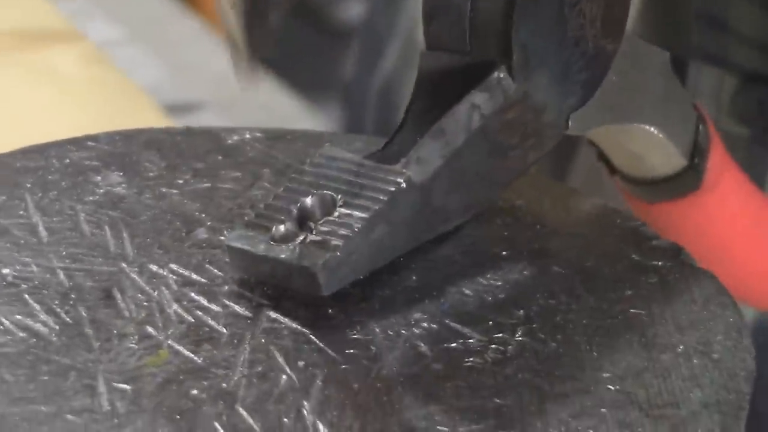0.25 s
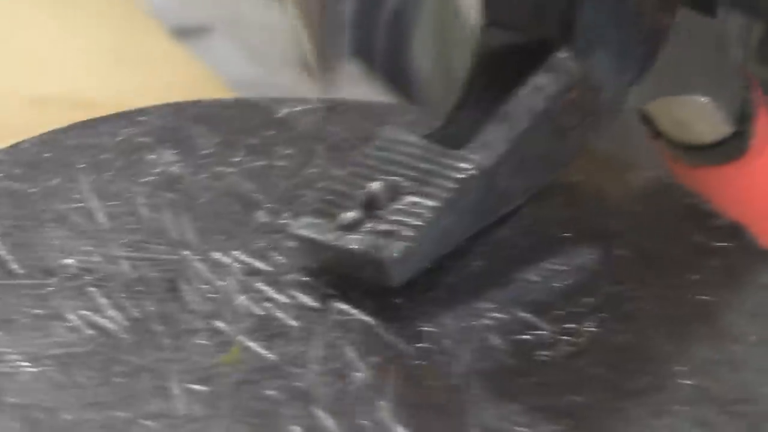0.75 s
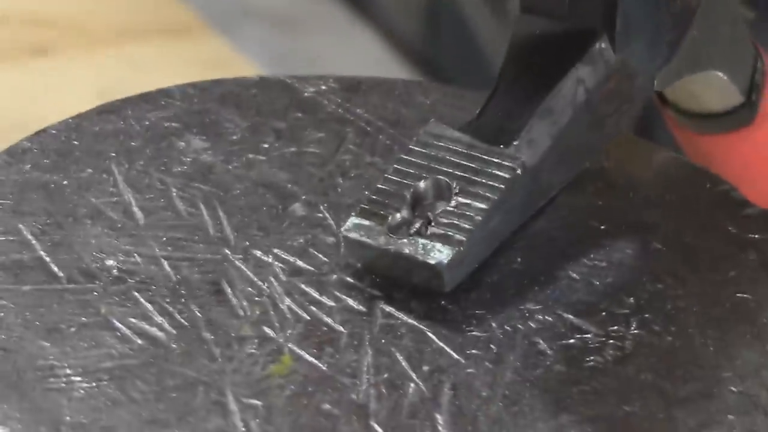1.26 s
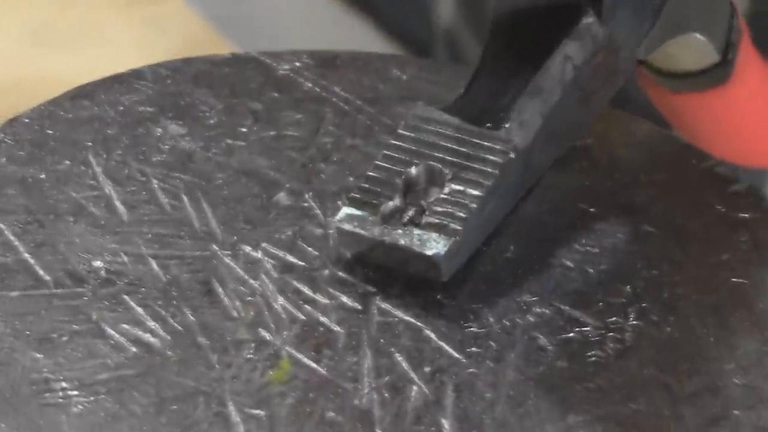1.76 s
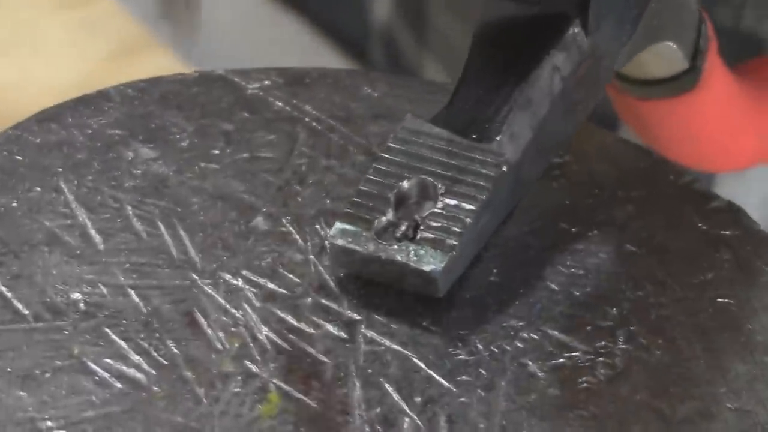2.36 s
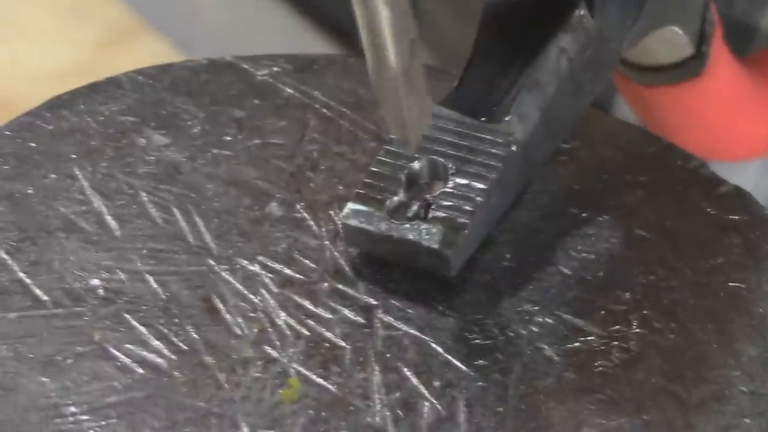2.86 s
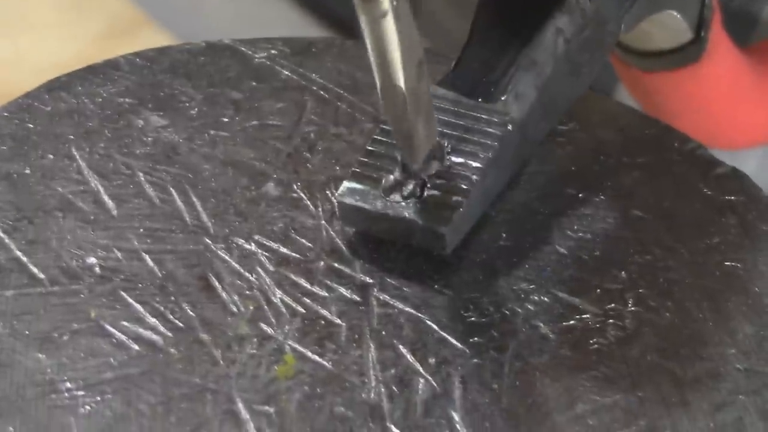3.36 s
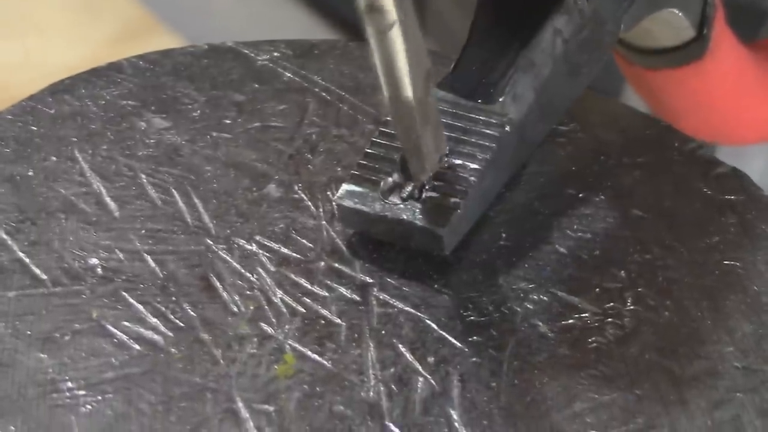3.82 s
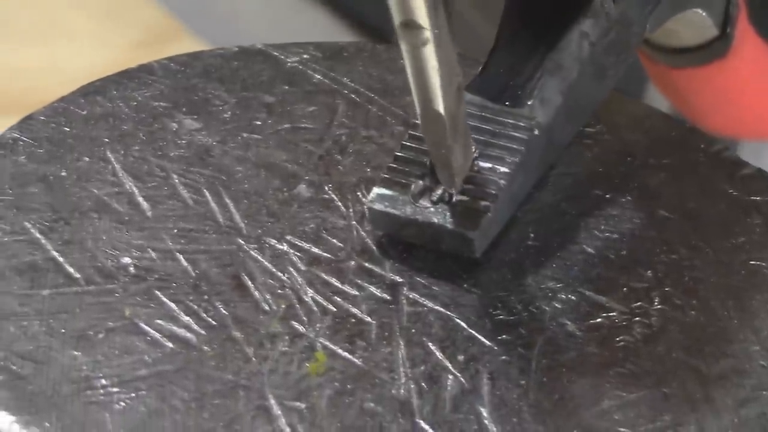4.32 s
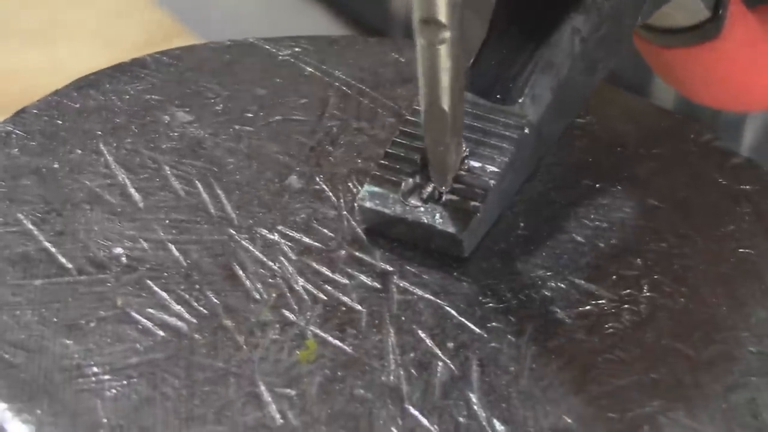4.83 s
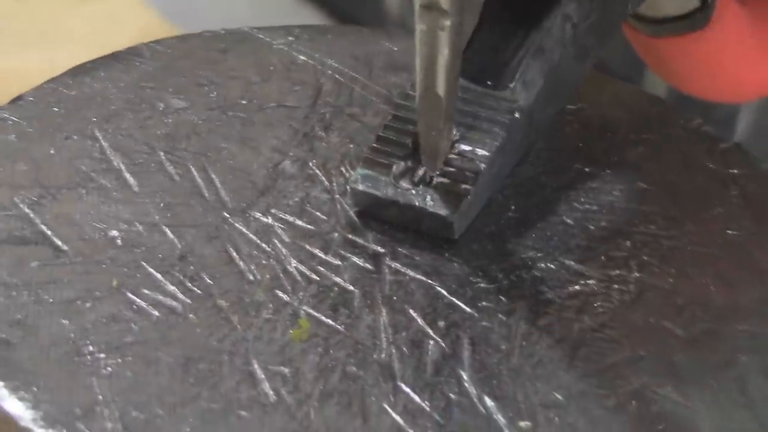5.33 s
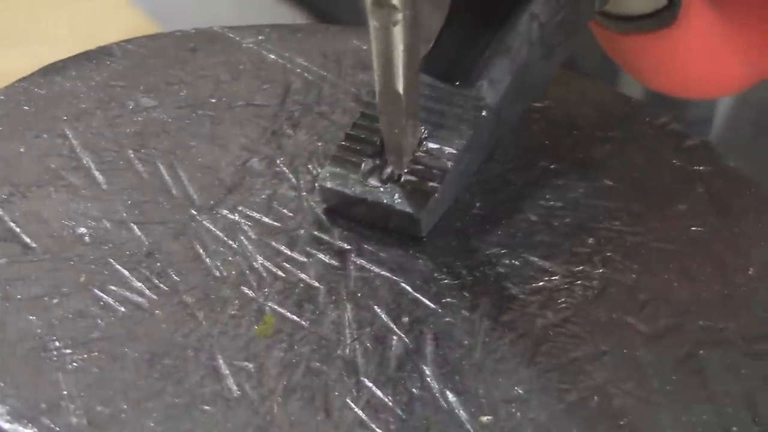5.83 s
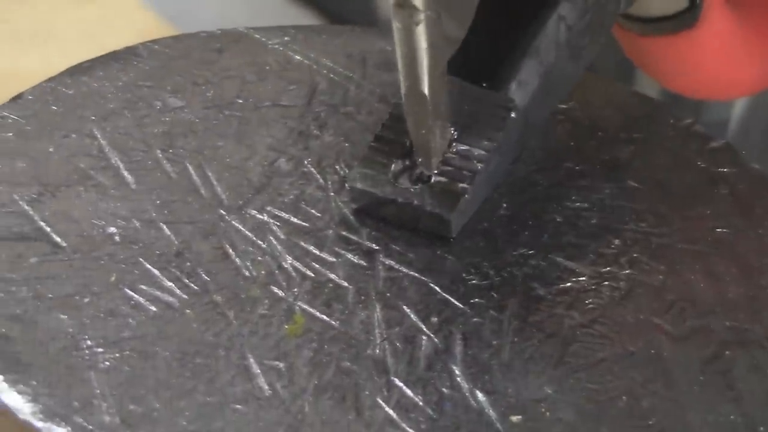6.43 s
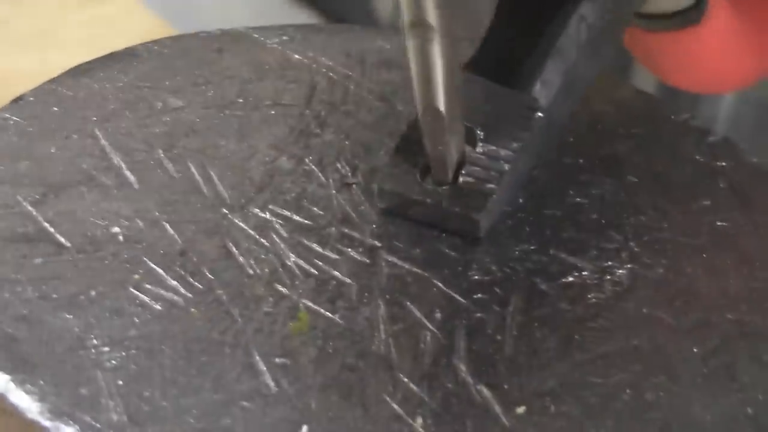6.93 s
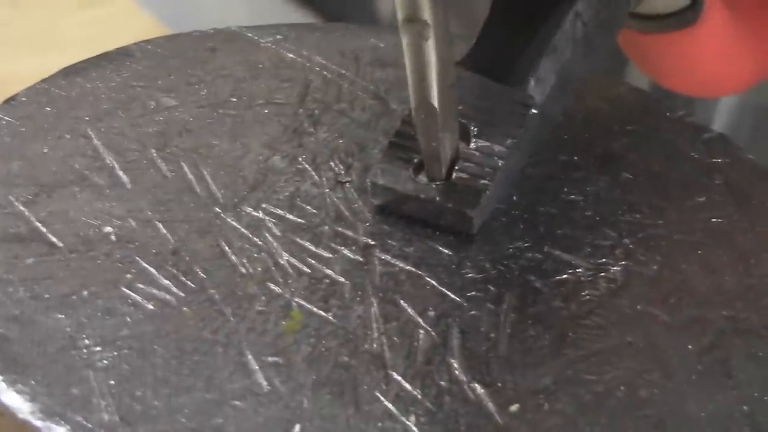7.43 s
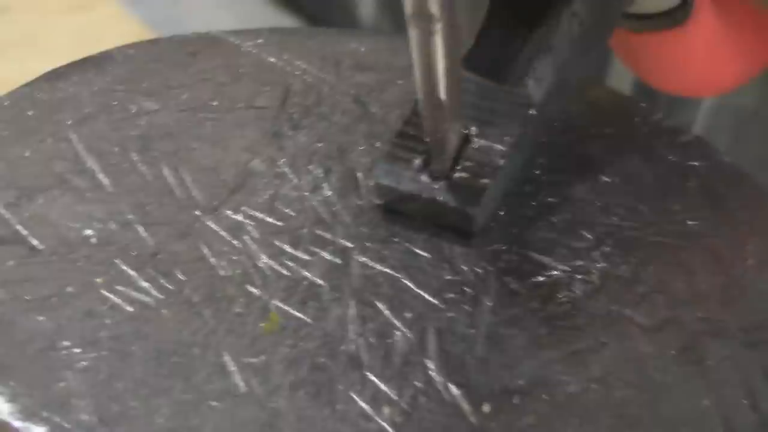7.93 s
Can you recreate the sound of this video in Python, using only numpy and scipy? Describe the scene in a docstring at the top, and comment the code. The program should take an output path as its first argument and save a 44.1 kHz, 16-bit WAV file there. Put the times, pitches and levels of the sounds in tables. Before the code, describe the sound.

Plier jaws tick and scrape on a steel block, then a hammer strikes a steel punch in several sharp, ringing blows.

```python
"""Hammer and punch at the workbench

A small workshop, the microphone close to a steel block on the bench. A plier jaw ticks and scrapes over
the block while a steel punch is set, then a hammer drives the punch into the jaw. Each blow cracks, rings
hammer and punch and makes the block hop on the boards. The room answers for half a second over a quiet
noise floor with a throbbing hum and a few faint tones."""
import sys
import numpy as np
from scipy import signal
from scipy.fft import rfft, irfft
from scipy.io import wavfile
from scipy.ndimage import uniform_filter1d

SR = 44100
rng = np.random.default_rng(int(sys.argv[2]) if len(sys.argv) > 2 else 0)


def generate_wav(sig):
    """Save sig (samples, or channels by samples) to the path in sys.argv[1] as 16-bit PCM at SR."""
    pcm = np.round(np.clip(np.atleast_2d(sig).T, -1, 1) * 32767).astype(np.int16)
    wavfile.write(sys.argv[1], SR, pcm)


N = 360738
T = np.arange(N) / SR

# Blows and rebounds, steel on steel. Each row: start in seconds, crack level in dB, brightest pitch in Hz,
# treble tilt in dB per octave, then the levels in dB of chatter, tool ring and the knock of the block.
BLOWS = [(5.407, -2.5, 2650, -2.5, -7, -39.5, -7), (5.716, 1, 4500, 3, -14, -37, -3.5),
         (5.755, -11.5, 2640, -7, -2.5, -57, -14), (6.1191, -12, 2763, -5, -9, -68, -10.5),
         (6.37, -6, 2800, -1, 3.5, -45.5, -5.5), (6.9004, 7.5, 6360, 4.5, -6, -34.5, -1.5),
         (6.9262, 5, 2728, 3, -7, -43.5, -5.5), (7.9646, 3.5, 7800, 4.5, -0.5, -32, -2),
         (7.98, -16.5, 6070, -4, -12.5, -56, -7), (8.0013, -12, 8000, 2, -1, -34.5, -2)]
# Modes of the plier jaw. Each row: frequency in Hz, level in dB, t60 in seconds.
JAW_MODES = [(370, -26, 0.01), (738.4, -14.5, .025), (1213, -11.5, 0.013), (1560, -13.5, 0.015),
             (2270, -9, .018), (2516, -4, 0.016), (3660, -7, 0.013), (4500, 2.5, 0.0074), (4960, -9, .02),
             (5400, -12, 0.014), (6100, -5, 0.0059), (7026, -6.5, .012), (8500, -3, 0.0052),
             (9800, -13, .008), (10630, -8, .012), (11620, -14, 0.0048), (14100, -14, .006)]


def hammer_blows():
    """Steel cracks and chatters, hammer and punch ring on. Returns the close sound and the room's feed."""
    # Spectra of the crack and of the thinner, brighter chatter. Each row: frequency in Hz, level in dB.
    crack_spectrum = [(710, -16), (1200, -4.5), (1850, 0.5), (2560, 5.5), (3140, 3.5), (3690, 4),
                      (4530, -4.5), (6400, 1.5), (7050, -2), (10400, -11.5), (15800, -28)]
    chatter_spectrum = [(1180, -34), (2000, -3.5), (2850, -5), (4920, -10.5), (7770, -6), (11100, -14),
                        (13100, -9.5), (14100, -24), (15300, -17), (15800, -28.5)]
    # Modes of hammer and punch. Each row: frequency in Hz, level in dB, t60 in seconds.
    tool_modes = [(6550, -11, .09), (7045, -9, .15), (7930, 0, .23), (3450, -7, .1), (2750, 11, .03),
                  (11600, -22, .1)]
    near, to_walls = np.zeros(N), np.zeros(N)
    size, chatter_s = 2048, 0.0055
    chatter_fade = np.exp(-(T[:size] / chatter_s) ** 4)
    for start, db, bright_hz, treble_db, chatter_db, ring_db, _ in BLOWS:
        crack = noise(crack_spectrum, size, treble_db) * fade(size, t60=0.011)
        crack += resonate(crack, [(bright_hz, 0.21 * bright_hz, 10)])
        crack += undb(chatter_db) * noise(chatter_spectrum, size, treble_db / 2) * chatter_fade
        crack = undb(db) * crack / np.abs(crack).max()
        add(near, start, crack)
        add(near, start, undb(ring_db) * ring(tool_modes, SR // 2, scatter_db=1))
        # the walls get the blow from all sides: the same energy, but an even colour
        click = colour(signal.unit_impulse(256, "mid"), crack_spectrum, treble_db - 8.5)
        add(to_walls, start, click * np.linalg.norm(crack) / np.linalg.norm(click))
    return near, to_walls


def block_knocks():
    """The block meets the bench with a dull knock; the boards ring and what lies on them rattles."""
    # The block rocks and lands again. Each row: middle of the contact in seconds, level in dB,
    # pitch in Hz, ring of the boards in dB.
    landings = [(5.4144, -20, 786, -22.5), (5.7219, -16, 847, -20), (5.7265, -7.5, 889, -8),
                (6.1261, -12, 690, -25), (6.418, -34, 500, -32), (6.907, -7, 1340, -2),
                (6.9106, -5, 1133, -7), (6.918, -19, 905, -5.5), (6.9345, -2, 787, 0.5),
                (6.9441, 2, 1323, -9.5), (6.957, -10, 830, 4), (7.2344, -41, 980, -35),
                (7.2469, -45, 944, -29.5), (7.257, -42, 1200, -31.5), (7.9732, 2, 1340, -1),
                (7.992, -6, 895, -5), (8.0131, 7, 1330, 2.5), (8.0223, 0, 1000, -16),
                (8.0355, -0.5, 930, -2.5), (8.044, -17, 700, -2.5)]
    # Modes of the bench boards. Each row: frequency in Hz, level in dB, t60 in seconds.
    board_modes = [(178, -36, 0.13), (283.3, -26.5, 0.063), (392, -29, .04), (462, -22.5, 0.051),
                   (495, -22, 0.11), (560, -24, 0.06), (712.6, -25, .04), (860, -17, .045),
                   (989, -20.5, .04), (1200, -21, 0.028), (1240, -24, 0.046), (1424, -21.5, 0.047),
                   (1700, -26.5, .03)]
    rattle_spectrum = [(200, -25), (500, -2.5), (1000, -2), (1700, -5.5), (3000, -11.5), (6000, -33)]
    lag_s, knock_hz, boards_over_knock_db = .002, 1190, 3  # each blow drives the block down
    driven = [(start + lag_s, db, knock_hz, db + boards_over_knock_db) for start, *_, db in BLOWS]
    out, size = np.zeros(N), 4096
    t = np.arange(-128, 128) / SR
    rise = np.clip(T[:size] / 0.0013, 0, 1)  # the boards take up the push over the contact
    for time, db, hz, boards_db in driven + landings:
        contact = np.sin(2 * np.pi * hz * t) * np.exp(-(t * hz / 0.6) ** 2)
        add(out, time + t[0], undb(db) * contact)
        rattle = noise(rattle_spectrum, size) * fade(size, t60=0.055)
        boards = ring(board_modes, size, scatter_db=3)
        add(out, time, undb(boards_db) * rise * (boards + undb(-15) * rattle))
    return out


def tool_ticks():
    """Punch and pliers touch the block: a click and the jaw's ring, coloured by where the touch falls."""
    # Each row: start in seconds, level in dB, treble gain in dB, bass gain in dB.
    touches = [(0.4, -54, -10, -7), (0.889, -53, -23, 4), (1.018, -52, -4, 11), (1.1594, -44, -1, 17.5),
               (1.2712, -20, -7, -5), (1.3243, -40.5, -19, 13), (1.3364, -41.5, -6, 23),
               (1.588, -44, 11, 10), (1.654, -51, 11, -11), (1.7717, -1.5, 5.5, -6),
               (1.7772, -13.5, 11.5, -9), (1.82, -23, -28, -3.5), (1.832, -30, -18, 5),
               (1.842, -21, -5, -2), (1.9519, -37, 9, 12), (2.032, -32.5, 0, -4), (2.6526, -23.5, 4, 4.5),
               (2.7685, -47, -7, 18), (2.789, -46.5, -12, 9), (3.6032, -41, -4.5, 1),
               (3.6068, -36.5, 1, -7.5), (3.6094, -34.5, 0, -3), (3.6577, -42, 10, -6),
               (3.6677, -52, 6, -4), (3.738, -44, -7, -4), (3.7423, -38.5, -13.5, 4),
               (4.0274, -46.5, -7, 22), (4.202, -44, -9, 15.5), (4.499, -55, 0, 16), (4.84, -54, -20, 3),
               (4.852, -39.5, -5.5, 8), (5.989, -51.5, 3.5, 2), (6.5914, -46, 5.5, 9),
               (6.8497, -38.5, -7.5, 13), (7.278, -43, -9, 16)]
    out, size = np.zeros(N), 2048
    rise = np.clip(T[:size] / .0006, 0, 1)
    for start, db, treble_db, bass_db in touches:
        modes = [(hz, mode_db + treble_db * (hz > 5000) + bass_db * (hz < 2000), t60)
                 for hz, mode_db, t60 in JAW_MODES]
        click_spectrum = [(800, -30.5), (3000, -1), (9000, treble_db), (16000, treble_db - 7)]
        click = noise(click_spectrum, size) * fade(size, t60=0.0082)
        tick = rise * (ring(modes, size, scatter_db=2) + click)
        add(out, start, undb(db) * tick / np.abs(tick).max())
    return out


def scrape(strokes, resonances, ring_db, treble_db, jerk_db, hump_db, hump_width_share):
    """Steel crossing scratches makes dense, uneven micro-impacts that ring the sliding part."""
    scratches = undb(1.5 * held(rng.exponential, 64).clip(0, 4))
    jerks = undb(jerk_db * uniform_filter1d(held(rng.standard_normal, 900), 600))  # the hand's uneven push
    grit = scratches * jerks * noise([(500, -33.5), (1500, -2), (3000, -2), (16000, -0.5)], N, treble_db)
    friction = grit + undb(ring_db) * resonate(grit, resonances)
    friction /= np.std(friction)
    out = np.zeros(N)
    for start, length, db, bright_hz in strokes:
        envelope = swell(length, rise=0.23, fall=0.442)
        rub = friction[int(start * SR):][:len(envelope)]
        hump = resonate(rub, [(bright_hz, hump_width_share * bright_hz, hump_db)])
        add(out, start, undb(db) * envelope * (rub + hump))
    return out


def jaw_slide():
    """The jaw is pushed over the scarred block in short strokes, which ring its middle modes."""
    # Each row: start in seconds, length in seconds, level in dB, brightest pitch in Hz.
    strokes = [(.8, 0.4, -76, 4000), (.96, 0.079, -72, 7000), (1.08, 0.34, -63.5, 9000),
               (1.375, 0.07, -67, 8000), (1.43, 0.19, -67, 9000), (1.58, 0.21, -73, 9000),
               (1.775, 0.068, -77, 8000), (1.89, 0.18, -64, 8140), (1.99, 0.069, -63, 4600),
               (2.04, 0.18, -68, 7000), (2.165, 0.19, -60, 8100), (2.4, 0.28, -68.5, 6600),
               (2.65, 0.078, -66.5, 7500), (2.74, 0.14, -76.5, 4500)]
    resonances = [(hz, np.log(1000) / np.pi / t60, db) for hz, db, t60 in JAW_MODES if 2000 < hz < 6000]
    return scrape(strokes, resonances, ring_db=5.5, treble_db=0.1, jerk_db=2.4,
                  hump_db=0.5, hump_width_share=0.302)


def punch_drag():
    """The tip of the punch drags into place with a thin, ringing scrape."""
    # Each row: start in seconds, length in seconds, level in dB, brightest pitch in Hz.
    strokes = [(4.88, .25, -70, 3200), (4.98, 0.26, -67, 5610)]
    # Resonances of the tip. Each row: frequency in Hz, width in Hz, gain in dB.
    resonances = [(3200, 90, 4), (3960, 60, -6), (5620, 200, 0), (6760, 100, -6), (8610, 160, -3),
                  (9700, 370, -8)]
    return scrape(strokes, resonances, ring_db=4, treble_db=-3, jerk_db=1.6,
                  hump_db=5.5, hump_width_share=.06)


def workshop_reverb(sound):
    """Reflections build up over some milliseconds and die away, the highest band first."""
    # Each row: band centre in Hz, t60 in seconds, level in dB.
    bands = [(142, 0.59, -55), (248, .42, -47), (700, 0.41, -55), (1900, 0.41, -54.5), (4000, .37, -52.5),
             (7000, 0.48, -47.5), (12000, .2, -48)]
    size = SR * 2 // 3
    tail = np.zeros(size)
    for hz, t60, db in bands:
        band = noise([(hz / 4, -30), (hz / 1.5, -3), (hz, 0), (hz * 1.5, -3), (hz * 4, -30)], size)
        tail += undb(db) * band * fade(size, t60)
    tail *= 1 + undb(7) * fade(size, t60=0.12)  # bench and near wall answer first
    tail *= np.clip((T[:size] - .002) / 0.0081, 0, 1)
    return signal.fftconvolve(sound, tail)[:N]


def room_tone():
    """Steady distant noise that has lost its top, and a hum that swells about once a second."""
    # Spectrum of the noise floor. Each row: frequency in Hz, level in dB.
    floor_spectrum = [(65, -47), (110, -21.5), (338, -6.5), (425, -8.5), (472, -5), (745, -9), (899, -6.5),
                      (997, -13.5), (1360, -9), (1610, -14), (2200, -17.5), (2340, -15.5), (2760, -18),
                      (10000, -26.5), (15800, -24.5)]
    floor = colour(undb(-65.5) * noise(floor_spectrum, N), [(20, 0), (9500, 0), (16000, -6)])
    hum_hz, throb_hz, throb_peak_s = 183.5, 1.013, .98
    throb = (.5 + .5 * np.cos(2 * np.pi * throb_hz * (T - throb_peak_s))) ** 4
    return floor + np.sqrt(2) * undb(-79) * throb * np.sin(2 * np.pi * hum_hz * T)


def distant_tones():
    """Short, faint, low tones swell and fade further off."""
    # Each row: middle in seconds, pitch in Hz, level in dB, length in seconds.
    tones = [(0.154, 485, -73.5, 0.31), (1.107, 284, -76, 0.16), (1.325, 343, -71, 0.16),
             (1.823, 367, -68, 0.35), (4.042, 501, -68.5, 0.068), (4.234, 346.3, -73, 0.18),
             (4.511, 348, -73.5, 0.2), (4.606, 499, -70.5, 0.094), (5.296, 572, -60, 0.047)]
    out = np.zeros(N)
    for middle, hz, db, length in tones:
        envelope = np.exp(-(2 * (T - middle) / length) ** 2)
        out += np.sqrt(2) * undb(db) * envelope * np.sin(2 * np.pi * hz * T)
    return out


def chirping():
    """A faint high tone pulses at an unsteady rate."""
    # Each row: time in seconds, level in dB.
    levels = [(2.75, -100), (2.82, -77), (3.6, -81.5), (4.7, -87), (6.8, -88.5), (7.0, -100)]
    times, db = np.transpose(levels)
    envelope = undb(np.interp(T, times, db, left=-150, right=-150))
    pitch_hz, mean_rate_hz = 5561, 13
    rate_hz = mean_rate_hz * (1 + .25 * held(rng.standard_normal, 4096))
    gate = np.clip(2 * np.sin(2 * np.pi * np.cumsum(rate_hz) / SR) + .5, 0, 1)
    return envelope * gate * np.sin(2 * np.pi * pitch_hz * T)


def whine():
    """One faint, brief whine nearly holds its pitch, then sags."""
    start_s, top_s, top_hz, sag_hz_per_s2 = 0.725, .79, 940, 4100
    envelope = swell(.29, rise=.2, fall=0.18)
    hz = top_hz - sag_hz_per_s2 * (start_s + T[:len(envelope)] - top_s) ** 2
    out = np.zeros(N)
    add(out, start_s, np.sqrt(2) * undb(-70) * envelope * np.sin(2 * np.pi * np.cumsum(hz) / SR))
    return out


def ring(modes, size, scatter_db):
    """Modes (Hz, dB, t60 s) struck once; place and angle of the blow change each one's share."""
    out = np.zeros(size)
    for hz, db, t60 in modes:
        share, sign, detune = rng.standard_normal(3)
        partial = np.sin(2 * np.pi * hz * (1 + .002 * detune) * T[:size])
        out += np.sign(sign) * undb(db + scatter_db * share) * partial * fade(size, t60)
    return out


def resonate(x, resonances):
    """Passes x through parallel resonances (Hz, width in Hz, dB at the centre)."""
    return sum(undb(db) * signal.lfilter(*signal.iirpeak(hz, hz / width, SR), x)
               for hz, width, db in resonances)


def colour(x, spectrum, tilt_db=0.):
    """Filters x by (Hz, dB) points, tilted by tilt_db an octave about 3 kHz."""
    hz = np.maximum(np.arange(len(x) // 2 + 1) * SR / len(x), 1)
    point_hz, point_db = np.transpose(spectrum)
    db = np.interp(np.log(hz), np.log(point_hz), point_db, left=-80)
    octaves = np.log2(np.maximum(hz, 500) / 3000)
    return irfft(rfft(x) * undb(db + tilt_db * octaves), len(x))


def noise(spectrum, size, tilt_db=0.):
    """Coloured noise of rms 1."""
    x = colour(rng.standard_normal(size), spectrum, tilt_db)
    return x / np.std(x)


def held(draw, step):
    """Random values through the scene, each held for step samples."""
    return draw(size=N // step + 1).repeat(step)[:N]


def swell(length_s, rise, fall):
    """Envelope that rises, holds and falls; rise and fall are shares of the length."""
    progress = np.linspace(0, 1, int(length_s * SR))
    ramp = np.clip(np.minimum(progress / rise, (1 - progress) / fall), 0, 1)
    return np.sin(np.pi / 2 * ramp) ** 2


def fade(size, t60):
    """Falls 60 dB in t60 seconds."""
    return np.exp(-np.log(1000) * T[:size] / t60)


def undb(db):
    return 10 ** (np.asarray(db) / 20)


def add(out, start_s, x):
    i = int(start_s * SR)
    out[i:i + len(x)] += x[:N - i]


def scene():
    """The bench close up, the workshop's answer and the faint background, in mono."""
    blows, blows_to_walls = hammer_blows()
    knocks = block_knocks()
    handling = tool_ticks() + jaw_slide() + punch_drag()
    reverb = workshop_reverb(blows_to_walls + undb(-2.5) * knocks + undb(-12) * handling)
    background = room_tone() + distant_tones() + chirping() + whine()
    return (blows + knocks + handling + reverb + background)[None]


def record(dry):
    """The microphone drops the deep bass and softens the top; the loudest peaks clip, the top is cut."""
    bass_hz, soften_hz, top_hz = 140, 13500, 15900
    x = signal.sosfilt(signal.butter(4, bass_hz, "high", fs=SR, output="sos"), dry)
    x = signal.sosfilt(signal.butter(2, soften_hz, fs=SR, output="sos"), x)
    rumble = undb(-89) * noise([(25, 5), (150, -9), (400, -43.5)], N)  # from the electronics
    clipped = np.clip(x + rumble, -1, 1)
    return signal.sosfilt(signal.ellip(8, .2, 60, top_hz, fs=SR, output="sos"), clipped)


dry = scene()
out = record(dry)
generate_wav(out)
```